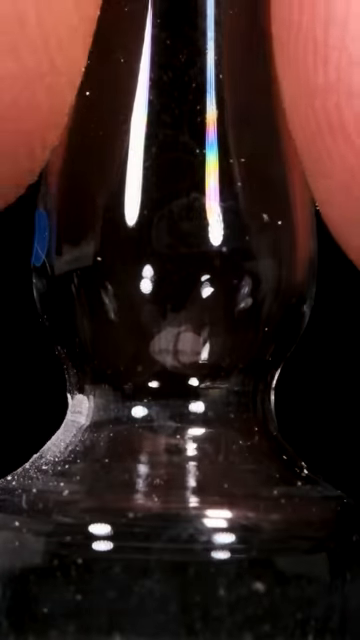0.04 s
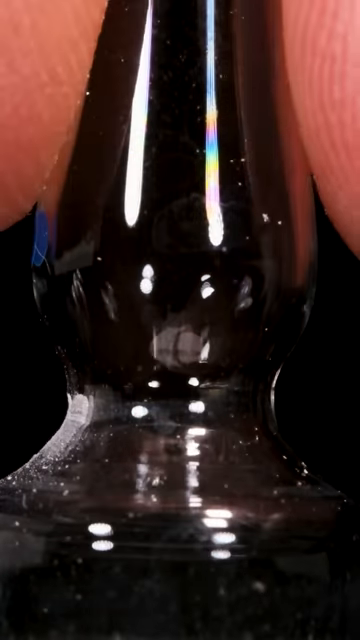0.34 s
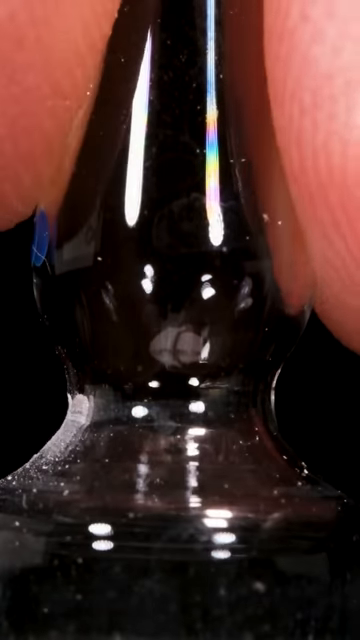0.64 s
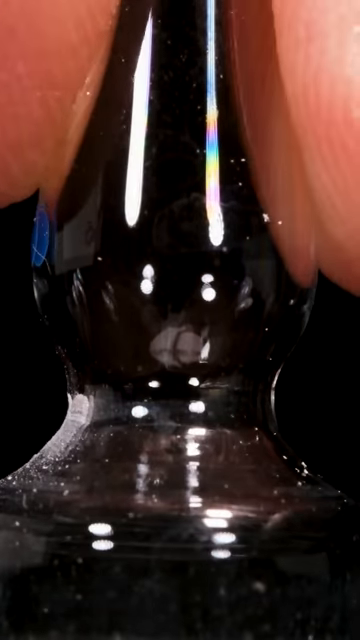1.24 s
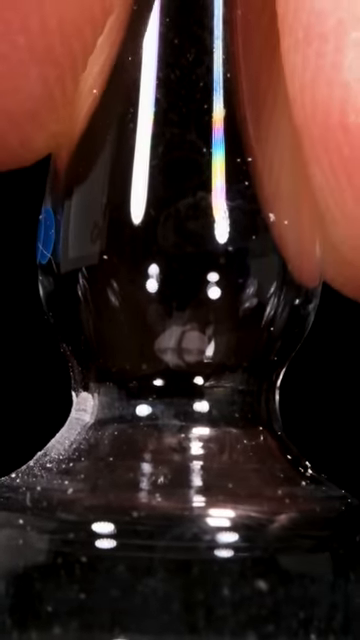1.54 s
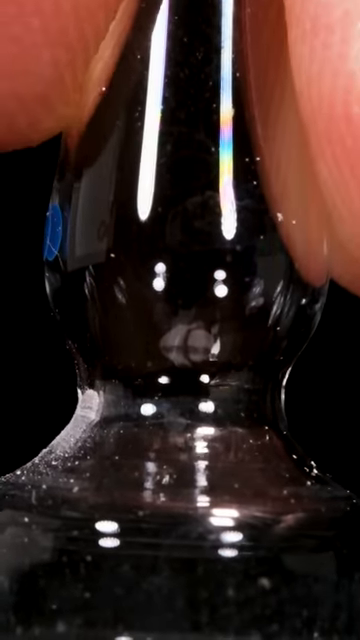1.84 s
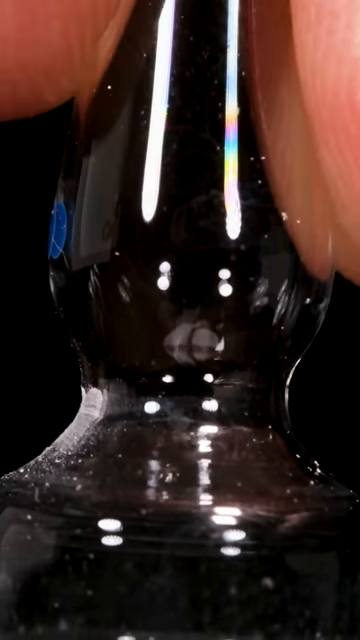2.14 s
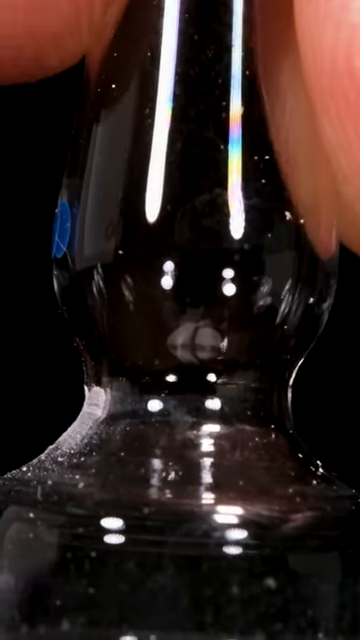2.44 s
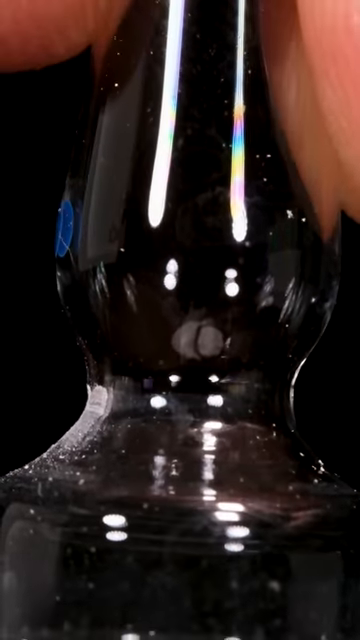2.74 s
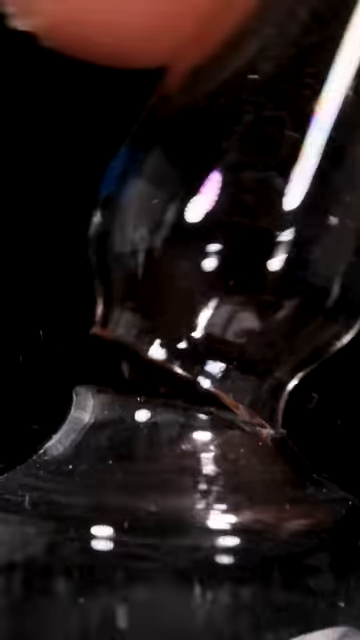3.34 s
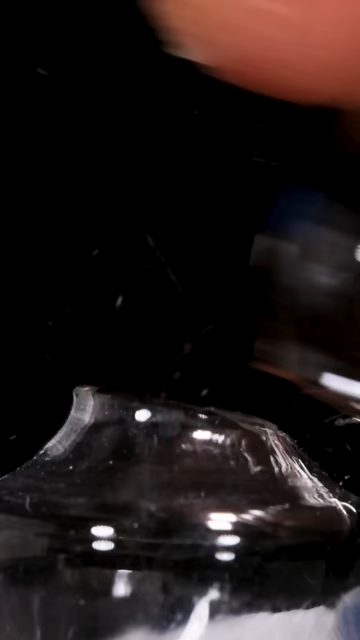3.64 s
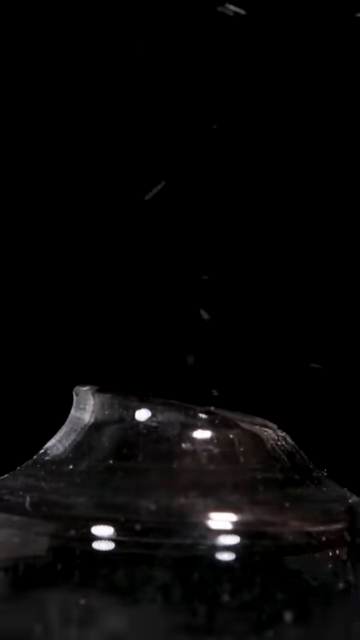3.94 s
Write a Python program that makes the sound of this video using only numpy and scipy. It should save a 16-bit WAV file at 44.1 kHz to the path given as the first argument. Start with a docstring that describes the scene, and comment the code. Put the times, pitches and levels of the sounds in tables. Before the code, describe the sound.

A glass ampoule neck crackles under finger pressure, then snaps with a sharp crack.

```python
"""Snapping a glass ampoule

Fingers bend the neck of an ampoule, very close to a stereo microphone in a rumbling room.
Skin rubs and ticks on the glass; the scored neck crackles under stress, then snaps with an
overloading crack. The broken rims scrape, and the loose tip knocks once on the open, hollow body.
Each blow is a sum of damped modes and a burst of noise; friction is noise of flickering level."""
import sys
import numpy as np
from scipy.fft import rfft, irfft, next_fast_len
from scipy.io import wavfile
from scipy.ndimage import map_coordinates

SR = 44100
rng = np.random.default_rng(int(sys.argv[2]) if len(sys.argv) > 2 else 0)


def dump(signal):
    """Clip the signal to [-1, 1] and save it as 16-bit WAV at the path in sys.argv[1]."""
    limited = np.clip(np.atleast_2d(signal).T, -1, 1)
    pcm = np.round(limited * 32767).astype(np.int16)
    wavfile.write(sys.argv[1], SR, pcm)


N = 176400
AGE = np.arange(SR // 2) / SR  # seconds since a blow


def amp(db):
    """Amplitude ratio: tenfold for every 20 decibels."""
    return 10 ** (np.asarray(db) / 20)


def unit(x):
    """Normalisation to an rms of 1."""
    return x / np.sqrt(np.mean(x ** 2) + 1e-20)


def along(points, hz):
    """Interpolation of (frequency_hz, value) points on a logarithmic frequency axis."""
    knots_hz, values = np.transpose(points)
    return np.interp(np.log(hz + 1), np.log(knots_hz + 1), values)


def curves(rows):
    """Linear interpolation in time: one envelope for each column after the first."""
    time_s, *columns = np.transpose(rows)
    return [np.interp(np.arange(N) / SR, time_s, column) for column in columns]


def wobble(rate_hz):
    """Smooth random modulation: a spline through evenly spaced Gaussian values."""
    knots = rng.standard_normal(int(N * rate_hz / SR) + 4)
    return map_coordinates(knots, [np.arange(N) * rate_hz / SR])


def decay(t, t60_s):
    """Exponential damping: a fall of 60 dB in t60_s."""
    return np.exp(-np.log(1000) * t / t60_s)


def noise(colour, size=N):
    """Partial coherence: mid and side noise mix to a coloured stereo pair, near mono in the bass."""
    # likeness of left and right: frequency_hz, correlation
    coherence = [(30, .3), (80, .92), (1300, .92), (1800, .4), (2300, -.1), (3500, 0), (15000, 0)]
    hz = np.fft.rfftfreq(size, 1 / SR)
    angle = np.arccos(np.clip(along(coherence, hz), -1, 1)) / 2
    spectrum = rfft(rng.standard_normal((2, size))) * amp(along(colour, hz))
    mid, side = irfft(spectrum * [np.cos(angle), np.sin(angle)], size)
    return unit(np.array([mid + side, mid - side]))


def friction(colour, flicker_db, rate_hz):
    """Amplitude modulation: rubbing is heard as noise whose level flickers at random."""
    return unit(noise(colour) * amp(flicker_db * wobble(rate_hz)))


def burst(colour, t60_s):
    """A broadband transient: coloured noise in exponential decay."""
    size = round(.2 * SR)
    out = np.zeros((2, len(AGE)))
    out[:, :size] = noise(colour, size) * decay(AGE[:size], t60_s)
    return out


def ring(modes, scatter_db, t60_scale=1):
    """Free vibration: a sum of damped modes, the higher ones more out of step at the two capsules."""
    # phase between the capsules: frequency_hz, phase_rad
    skew = [(300, .25), (1400, .3), (1800, .9), (2300, 1.7), (12000, 1.6)]
    out = np.zeros((2, len(AGE)))
    for k, (hz, db, t60_s) in enumerate(modes):
        t = AGE[:int(1.3 * t60_s * t60_scale * SR)]
        phase = rng.uniform(0, 2 * np.pi) + (-1) ** k * along(skew, hz) * np.array([[.5], [-.5]])
        wave = np.sin(2 * np.pi * hz * t + phase)
        strength = amp(db + scatter_db * rng.standard_normal())
        out[:, :len(t)] += strength * decay(t, t60_s * t60_scale) * wave
    return out


def add(track, start_s, sound):
    """Superposition: a sound joins the track at start_s."""
    part = track[:, round(start_s * SR):][:, :sound.shape[1]]
    part += sound[:, :part.shape[1]]


def room():
    """Background noise: a rumble with a phase-modulated hum and faint whine, stronger on the left."""
    # rumble spectrum: frequency_hz, level_db
    rumble_colour = [(10, -18), (25, -19), (45, -17), (66, -1), (95, 0), (120, -1), (143, -9), (170, -9),
                     (200, -18), (260, -16), (320, -22), (420, -23), (700, -29), (1200, -34), (2100, -44.5),
                     (3500, -52.5), (6000, -57.5), (12000, -68), (16000, -78)]
    # hum and whine: pitch_hz, level_db
    tones = [(113, -34), (1199, -58)]
    t = np.arange(N) / SR
    hum = sum(amp(db) * np.sqrt(2) * np.sin(2 * np.pi * hz * t + .7 * wobble(8)) for hz, db in tones)
    rumble = amp(-28) * noise(rumble_colour)
    return (rumble + hum) * amp([[1.9], [-1.9]])


def fingers():
    """Stick-slip friction: skin hisses over the glass and lets go in small ticks."""
    # envelope of the rubbing: time_s, level_db
    rubbing = [(0, -90), (.3, -85), (.33, -64), (.42, -64), (.46, -72), (.54, -64), (.59, -85), (.8, -80),
               (.83, -61), (.92, -61), (1.0, -51), (1.09, -66), (1.2, -76), (1.59, -76), (1.63, -63),
               (1.72, -61), (1.8, -50), (1.89, -64), (1.94, -61), (2.0, -67), (2.1, -54), (2.36, -61),
               (2.51, -52), (2.6, -62), (3.2, -75)]
    # spectra of the rubbing and of a tick: frequency_hz, level_db
    skin_colour = [(1000, -20), (2500, -4), (6000, -5), (8500, 0), (11000, -1), (15500, -5)]
    tick_colour = [(500, -10), (1100, 2), (2800, -1), (4500, -12), (11000, -12), (16000, -20)]
    # releases of the skin: start_s, level_db
    ticks = [(1.2244, -30), (1.232, -35), (1.262, -38), (1.2822, -32), (1.4099, -28), (1.7235, -26),
             (1.736, -37), (1.814, -31), (2.139, -38), (2.161, -32)]
    # modes excited by a tick: pitch_hz, level_db, t60_s
    tick_modes = [(1050, -3, .05), (1700, -1, .03), (2310, -1, .035), (2620, -2, .035), (3010, -2, .04),
                  (4010, -9, .05), (5190, -10, .05), (6150, -7, .11), (6760, -6, .06), (8250, -12, .06),
                  (8770, -13, .06), (10900, -10, .06)]
    skin_db, = curves(rubbing)
    out = amp(skin_db) * friction(skin_colour, flicker_db=2.5, rate_hz=300)
    for start_s, db in ticks:
        tick = amp(-10) * ring(tick_modes, scatter_db=2) + amp(-7) * burst(tick_colour, t60_s=.04)
        add(out, start_s, amp(db) * tick)
    return out


def wall_modes(count):
    """Normal modes of the glass wall: the strong ones, and weaker ones spread unevenly in the treble."""
    # strong modes: pitch_hz, level_db, t60_s
    strong = [(2290, -6, .13), (2825, -4, .16), (3590, -8, .14), (3970, -2, .15), (4305, -3.5, .19),
              (4510, -5, .1), (4735, 2, .12), (5272, -2, .17), (5762, -2, .13), (6140, -11, .13),
              (6577, -4, .17), (6940, -7, .15), (7140, 0, .13), (8128, -4, .14), (8310, -11, .14),
              (9290, -12, .14), (9560, -14, .16), (10320, -15, .16), (10645, -15, .17), (11270, -15, .15)]
    low_hz, high_hz, tilt_db_per_octave = 3300, 14200, -4
    pitches = low_hz + (high_hz - low_hz) * (np.arange(count) + rng.uniform(size=count)) / count
    return strong + [(hz, -12 + tilt_db_per_octave * np.log2(hz / low_hz), .15) for hz in pitches]


def crackles(glass):
    """Transient excitation: each jolt rings the gripped ampoule and its wall, and crushes splinters."""
    # crackles of the neck and, last, a dull bump leading into the tip's knock:
    # start_s, level_db, thud_db, glass_db, treble_db, rise_s
    jolts = [(2.177, -31, 0, 7, 0, .004), (2.19, -31, 0, 7, 0, .004), (2.225, -36, 0, 8, 0, .002),
             (2.275, -38, 0, 8, 0, .002), (2.3777, -30, -6, 3, 0, .0007), (2.416, -8, -14, 2, 1, .0003),
             (2.435, -17, -10, 7, 5, .001), (2.4575, -15, -12, 6, 5, .0005), (2.489, -13, -10, 4, 0, .002),
             (2.505, -24, 0, 0, 0, .001), (2.525, -26, 6, 1, 0, .001), (2.538, -25, 6, 0, 0, .001),
             (2.563, -19, 4, 1, 0, .002), (2.591, -20, 4, -1, -3, .002), (2.618, -18, 4, -2, -2, .001),
             (2.6295, -6, -6, 0, -1, .0003), (2.638, -14, 0, 10, 6, .002), (2.677, -15, 1, -1, -2, .002),
             (2.7125, -14, 4, 4, 0, .002), (2.754, -15, 2, 1, 2, .001), (2.761, -11, 1, 3, 2, .001),
             (2.8005, -14, 5, 4, 2, .001), (2.844, -14, 5, -5, -4, .001), (2.8925, -12, 4, -5, -4, .0005),
             (2.902, -16, 4, 5, 0, .001), (2.933, -14, 0, 8, 5, .002), (2.941, -15, -4, 8, 4, .002),
             (2.953, -12, 3, 0, -5, .001), (3.006, -10, 2, -7, -7, .001), (3.022, -14, -2, 7, 7, .002),
             (3.0755, -12, 5, -2, -2, .0005), (3.12, -31, 0, 0, 0, .002), (3.138, -29, 0, 0, 0, .001),
             (3.1795, -11, 7, -3, -3, .0007), (3.3505, -13, -6, -2, -2, .0005),
             (3.583, -16, 10, -4, 0, .002)]
    # modes of the gripped ampoule, and its low ones against the hand: pitch_hz, level_db, t60_s
    gripped_modes = [(684, 0, .08), (822, -4, .07), (935, -5, .06), (1092, -4, .06), (1355, 0, .06),
                     (1630, -5, .05), (1840, -3, .045), (2120, -7, .05), (2610, -6, .05), (2840, -10, .06)]
    thud_modes = [(168, -6, .12), (255, -14, .09), (410, -7, .08), (520, -13, .06)]
    # spectra of the crunch and the splinters: frequency_hz, level_db
    crunch_colour = [(150, -24), (450, -13), (700, 0), (1800, -1), (3200, -13), (6000, -22), (14000, -38)]
    splinter_colour = [(1500, -20), (4500, 0), (7000, -1), (10000, -3), (13700, -8), (15000, -28)]
    out = np.zeros((2, N))
    flicker = unit(amp(3 * wobble(600)))
    for start_s, db, thud_db, glass_db, treble_db, rise_s in jolts:
        body = ring(gripped_modes, scatter_db=2) + amp(thud_db) * ring(thud_modes, scatter_db=1.5)
        crunch = amp(-9) * burst(crunch_colour, t60_s=.055)
        wall = amp(glass_db - 25) * ring(glass, scatter_db=3.5, t60_scale=.6)  # damped by the grip
        grain = np.roll(flicker, -round(start_s * SR))[:len(AGE)]
        splinters = amp(treble_db - 20.5) * burst(splinter_colour, t60_s=.07) * grain
        attack = 1 - np.exp(-AGE / rise_s)
        add(out, start_s, amp(db) * (amp(-10.5) * body + crunch + wall + splinters) * attack)
    return out


def snap_and_knock(glass):
    """Impulse excitation: the fracture, then the tip's knock, ring the hollow body and the wall."""
    # the two blows: start_s, body_db, glass_db, t60_scale, burst_db, burst_t60_s
    snap = (3.2404, 2.5, -11, 1.15, 2, .1)
    knock = (3.596, -3, -13, .7, 0, .055)
    # hollow modes as the neck parts, and once the body is open: pitch_hz, level_db, t60_s
    parting_modes = [(382, -14, .16), (690, -6, .14), (736, -5, .19), (1005, -8, .1), (1088, 3, .12),
                     (1351, 0, .15), (1690, -5, .07), (2075, -9, .07)]
    open_modes = [(351, -8, .42), (480, -6, .04), (690, -1, .08), (722, -12, .45), (830, -5, .06),
                  (1053, -14, .25), (1200, 3, .06), (1646, -6, .06), (1778, -7, .07), (2098, -7, .08)]
    # spectrum of a blow: frequency_hz, level_db
    blow_colour = [(60, -14), (400, -8), (700, 0), (1100, 1), (1800, -1), (2800, -13), (5000, -8),
                   (8000, -12), (12000, -22), (16000, -36)]
    out = np.zeros((2, N))
    for blow, hollow_modes in [(snap, parting_modes), (knock, open_modes)]:
        start_s, body_db, glass_db, t60_scale, burst_db, burst_t60_s = blow
        body = amp(body_db) * ring(hollow_modes, scatter_db=.5)
        wall = amp(glass_db) * ring(glass, scatter_db=1.5, t60_scale=t60_scale)
        add(out, start_s, body + wall + amp(burst_db) * burst(blow_colour, burst_t60_s))
    add(out, 3.253, amp(-7) * burst(blow_colour, t60_s=.07))  # the fracture tears on round the neck
    return out


def broken_edges():
    """Sliding friction: the parted rims scrape on each other, gritty, and shed small chips."""
    # envelopes of the rubbing rims: time_s, scrape_db, grit_db
    rubbing = [(3.235, -80, -90), (3.26, -27, -42), (3.35, -29, -42), (3.42, -28, -47), (3.48, -26, -40),
               (3.53, -27, -44), (3.56, -29, -41), (3.62, -25, -48), (3.72, -29, -48), (3.79, -34, -46),
               (3.87, -37, -45), (4, -40, -54)]
    # spectra of the dull scrape, the grit and a chip: frequency_hz, level_db
    scrape_colour = [(40, -12), (150, -3), (260, -1), (371, -7), (701, -3), (1200, -8), (2100, -12),
                     (3400, -22), (8100, -30), (12900, -43), (15000, -60)]
    grit_colour = [(1500, -12), (2600, 2), (4300, 4), (8000, 0), (11000, -4), (13500, -15), (15500, -30)]
    chip_colour = [(2000, -15), (4000, -3), (8000, 0), (11000, -1), (15500, -14)]
    # chips leaving the rim: start_s, level_db
    chips = [(3.469, -33), (3.496, -32), (3.551, -34), (3.7455, -17), (3.789, -33), (3.8165, -37),
             (3.9335, -32), (3.94, -35)]
    scrape_db, grit_db = curves(rubbing)
    out = amp(scrape_db) * friction(scrape_colour, flicker_db=1.4, rate_hz=150)
    out += amp(grit_db) * friction(grit_colour, flicker_db=4.5, rate_hz=450)
    for start_s, db in chips:
        add(out, start_s, amp(db) * burst(chip_colour, t60_s=.025))
    return out


def capsule_swing():
    """Overload recovery: after the crack the right capsule settles in a slow damped oscillation."""
    start_s, swing_hz = 3.268, 4.2
    t = np.maximum(np.arange(N) / SR - start_s, 0)
    swing = amp(-2) * decay(t, t60_s=.6) * np.sin(2 * np.pi * swing_hz * t)
    return swing * np.array([[0], [1]])


def scene():
    """Superposition of all sources; crackles, snap and knock share one set of wall modes."""
    glass = wall_modes(count=36)
    ampoule = fingers() + crackles(glass) + snap_and_knock(glass) + broken_edges()
    return room() + ampoule + capsule_swing()


def record(dry):
    """Saturation and band limiting: the recorder clips hard, then a steep low-pass cuts the top."""
    cutoff_hz = 15500
    size = next_fast_len(N + SR // 2)
    clipped = np.clip(dry, -1, 1)
    low_pass = 1 / (1 + (np.fft.rfftfreq(size, 1 / SR) / cutoff_hz) ** 60)
    return irfft(rfft(clipped, size) * low_pass, size)[:, :N]


dry = scene()
out = record(dry)
dump(out)
```